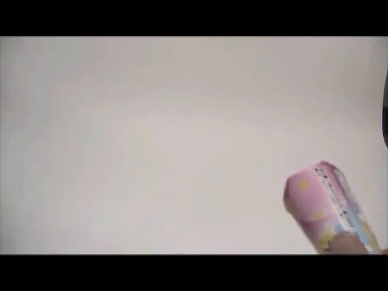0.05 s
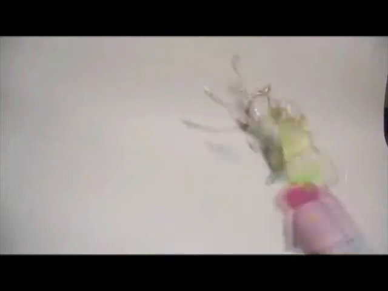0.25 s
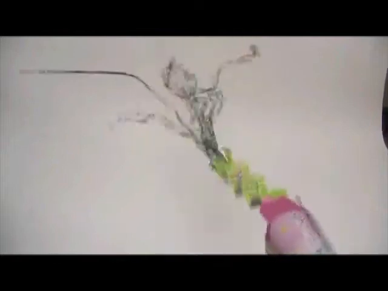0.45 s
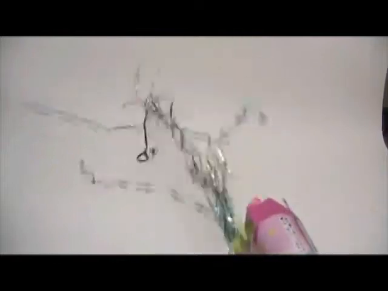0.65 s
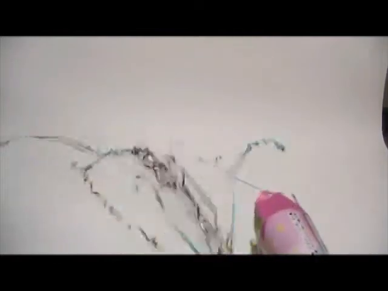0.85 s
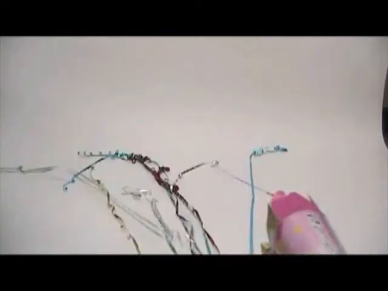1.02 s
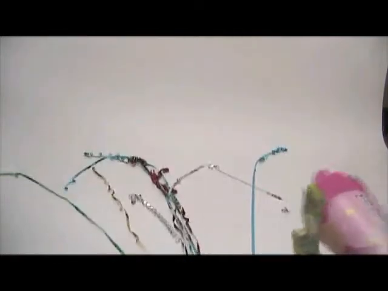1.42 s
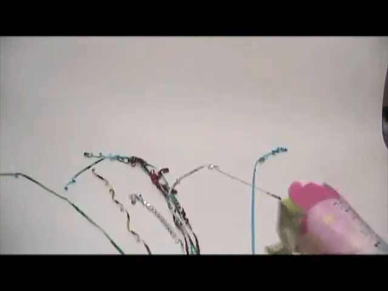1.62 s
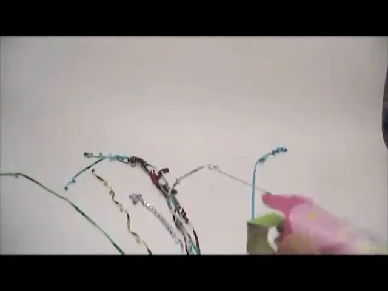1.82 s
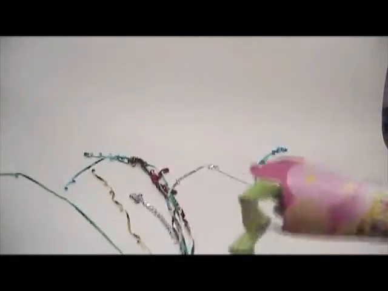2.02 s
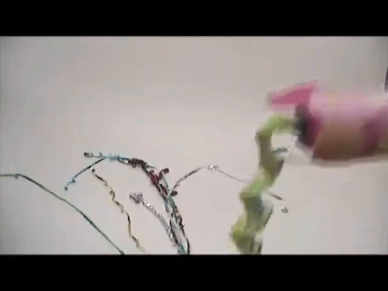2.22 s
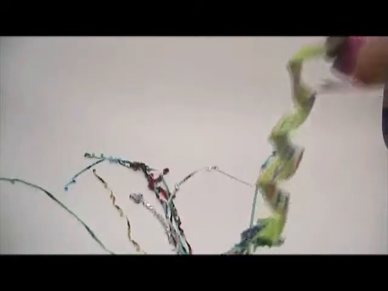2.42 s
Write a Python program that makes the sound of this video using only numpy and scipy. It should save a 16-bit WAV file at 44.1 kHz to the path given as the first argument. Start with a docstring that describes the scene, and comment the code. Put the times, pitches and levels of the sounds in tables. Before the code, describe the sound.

A party popper bangs loudly up close, then paper streamers snap, rustle and settle.

```python
"""A party popper goes off close by in a small room, loud enough to overload the microphone.
Its string creaks, the charge fizzes and bursts, and the blast rings the cardboard cone.
The cap and paper wad knock about; the streamers snap taut, flick the table, rustle and settle.
Near the end the paper on the popper rustles as a hand turns it."""
import sys
import numpy as np
from scipy import signal
from scipy.fft import rfft, irfft, next_fast_len
from scipy.io import wavfile
from scipy.ndimage import map_coordinates

SR = 44100
rng = np.random.default_rng(int(sys.argv[2]) if len(sys.argv) > 2 else 0)


def wrap_up_sound(samples):
    """Save the sound to the file named by the first command line argument, as 16-bit audio."""
    columns = np.atleast_2d(samples).T
    # keep every value between -1 and 1, then stretch to whole-number steps
    tamed = np.clip(columns, -1, 1)
    steps = np.round(tamed * 32767).astype(np.int16)
    wavfile.write(sys.argv[1], SR, steps)


N = 112454

# The tone of each noise, from bass to treble. Each row: frequency in Hz, relative level in dB.
BACKGROUND_TONE = [(25, 1.5), (45, 0.5), (75, -7.5), (120, -2), (200, -6.5), (310, -3), (500, -10),
                   (1000, -13), (2500, -20), (11000, -33.5)]
ROOM_TONE = [(60, -12), (300, 5.5), (700, -4.5), (2200, -0.5), (4000, -7.5), (7000, -12.5), (11000, -17.5)]
HANDLING_TONE = [(300, -12), (2400, -1), (11000, -21)]
CRINKLE_TONE = [(100, -17.5), (300, 9), (700, -2), (1100, 2.5), (2000, 3.5), (4000, -5), (7000, -8),
                (11000, -19.5)]
HISS_TONE = [(500, -26), (2500, 4.5), (4500, 5), (7500, 6.5), (10000, 7.5), (11500, -6)]
SLIDE_TONE = [(1000, -18), (4000, -14), (6500, -8), (8500, -9.5), (11000, -21)]
THUD_TONE = [(25, -50), (70, -33), (140, -7.5), (230, 0), (380, -4), (560, 2.5), (850, -7.5), (1350, -2),
             (2000, -7), (4000, -26.5), (11000, -21)]
CRACK_TONE = [(100, -18), (1200, -2.5), (4500, 0.5), (11000, -12.5)]
BOOM_TONE = [(25, -56), (70, -21), (130, -8.5), (240, 4.5), (340, 1.5), (550, -18), (1000, -24)]
CREAK_TONE = [(60, -12.5), (420, 10), (800, -3), (1400, 12), (2400, -8.5), (3600, 4), (7000, 1),
              (11000, -12.5)]
FIZZ_TONE = [(200, -26.5), (2000, -15.5), (9000, 7.5), (11000, -11.5)]
BLAST_TONE = [(20, -12.5), (45, -2.5), (90, 7), (250, -3), (1000, 12.5), (2800, 6.5), (6500, 1),
              (9000, -1.5), (11000, -9.5)]
ECHO_TONE = [(50, -39.5), (150, -23), (400, -6.5), (560, 1.5), (900, 2), (1250, -5), (1550, -1),
             (1800, -10), (2400, -15.5), (3500, -16.5), (5200, -22), (6500, -19), (8000, -25.5),
             (11000, -26)]
# How alike left and right sound. Each row: frequency in Hz, likeness from 0 (unrelated) to 1 (same).
USUAL_LIKENESS = [(60, 0.19), (300, 0.93), (900, .88), (2000, 0.78), (5000, .6), (11000, .5)]
BACKGROUND_LIKENESS = [(60, 0)]
BLAST_LIKENESS = [(100, 0.61)]
# The hand turns the popper. Each row: start in seconds, level in dB.
HAND_TURNS = [(1.715, -51), (1.79, -47.5), (1.918, -49), (2.262, -54)]
# Streamers and wrapper rub. Each row: time in seconds, crinkle level in dB, hiss level in dB.
RUSTLE_LEVELS = [(0, -104, -88), (.2, -51.5, -90), (.3, -41, -53), (.46, -73, -44), (.62, -68, -52.5),
                 (0.798, -46, -47), (.89, -51.5, -50), (.93, -41.5, -49), (1.031, -51, -49),
                 (1.178, -53, -58), (1.281, -59.5, -54.5), (1.439, -56, -62.5), (1.58, -62.5, -71.5),
                 (1.85, -60, -70), (1.981, -55, -64), (2.08, -57.5, -65.5), (2.231, -59, -61.5),
                 (2.28, -55.5, -57), (2.419, -58, -59), (2.55, -55.5, -56.5)]
# Paper slides over paper. Each row: loudest moment in seconds, half length in seconds, level in dB.
SLIDES = [(1.258, 0.011, -52), (1.503, 0.0093, -53.5), (1.66, 0.03, -53)]
# Light taps. Each row: start in seconds, pitch in Hz, level in dB.
TAPS = [(0.126, 382, -38.5), (0.1753, 2050, -44), (0.4186, 1360, -31), (1.038, 900, -41),
        (1.218, 880, -46.5), (1.3044, 2200, -48.5)]
# Streamer ends hit the table. Each row: start in seconds, level in dB.
FLICKS = [(0.861, -40), (0.9149, -34.5), (.93, -53), (0.97, -30.5), (1.0372, -30), (1.108, -38),
          (1.3045, -36.5), (1.39, -39.5)]
# Streamers pull tight. Each row: start in seconds, level in dB.
SNAPS = [(.473, -16), (0.56, -22), (0.5675, -14), (.634, -15.5), (0.716, -13), (0.726, -25),
         (0.7402, -15.5), (0.7705, -8), (0.778, -30), (0.9185, -29), (0.9482, -35), (1.0463, -29),
         (1.075, -35.5)]
# The cap and paper wad land. Each row: start in seconds, thud level in dB, crack level in dB.
KNOCKS = [(0.3668, -30.5, -31.5), (0.4206, -34.5, -45), (0.4486, -25, -20), (0.4568, -29, -23),
          (0.4726, -30, -20), (.492, -31, -27.5), (0.5467, -33.5, -31.5), (0.7161, -38, -50),
          (0.7702, -50, -35)]
# The pull string slips. Each row: start in seconds, level in dB.
STRING_SLIPS = [(0.0399, -39.5), (.059, -47.5), (0.0909, -23), (0.1175, -39.5), (.126, -40.5), (.181, -46),
                (0.1886, -25)]
# The cone's main notes, then the shove of air with the tube's low note.
# Each row: pitch in Hz, level in dB, fade time in seconds.
CONE_NOTES = [(718, -11.5, 0.092), (777, 5, 0.017), (916, -2, 0.066), (1071, 10, 0.044)]
PUSH_NOTES = [(66, -18.5, .045), (113, -10.5, 0.051), (515, 0, 0.04)]
# Notes that ring on after the burst. Each row: pitch in Hz, relative level in dB.
LINGERING_NOTES = [(330, -9.5), (441, -5.5), (520, -10), (604, -8.5), (707, 1.5), (814, -1), (851, -17),
                   (934, -3.5), (1068, -3.5), (1168, 2), (1277, -0.5), (1486, -4.5), (1556, -3.5),
                   (2350, -13.5)]

TOP_HZ = 11350  # the treble ends here
BOOM_FADE_S = 0.42  # a fade time is how long a sound takes to drop by 60 dB


def amp(db):
    """Turn decibels into a number to multiply by."""
    return 10 ** (np.asarray(db) / 20)


def unit(x):
    """Scale a sound so that its average power is 1."""
    return x / np.sqrt(np.mean(x ** 2) + 1e-20)


def look_up(table, hz):
    """Read between a table's rows, with frequency spaced by octaves."""
    row_hz, values = np.transpose(table)
    return np.interp(np.log(hz + 1), np.log(row_hz + 1), values)


def shape(pair, tone, likeness=USUAL_LIKENESS):
    """Blend two unrelated signals into stereo with this tone and left-right likeness."""
    size = next_fast_len(pair.shape[1])
    hz = np.fft.rfftfreq(size, 1 / SR)
    width = np.arccos(np.clip(look_up(likeness, hz), -1, 1)) / 2
    gain = amp(look_up(tone, hz)) * (hz < TOP_HZ) * [np.cos(width), np.sin(width)]
    mid, side = irfft(rfft(pair, size) * gain, size)[:, :pair.shape[1]]
    return unit(np.array([mid + side, mid - side]))


def noise(tone, likeness=USUAL_LIKENESS, size=N):
    """Steady stereo noise."""
    return shape(rng.standard_normal((2, size)), tone, likeness)


def fade(fade_s, rise_s=1e-4):
    """A one-second loudness curve that rises quickly and dies away."""
    t = np.arange(SR) / SR
    return np.exp(-np.log(1000) * t / fade_s) * (1 - np.exp(-t / rise_s))


def burst(tone, fade_s, rise_s=1e-4):
    """A dying puff of stereo noise."""
    return noise(tone, size=SR) * fade(fade_s, rise_s)


def pulse(hz, fade_s, rise_s):
    """A sharp push of air, only a wave or two long."""
    return np.cos(2 * np.pi * hz * np.arange(SR) / SR) * fade(fade_s, rise_s)


def ringing(notes, rise_s, lead_s=0):
    """Notes struck together; their waves reach the right side lead_s earlier."""
    t = np.arange(SR) / SR + lead_s * np.array([[-.5], [.5]])
    return sum(amp(db) * np.sin(2 * np.pi * hz * t) * fade(fade_s, rise_s) for hz, db, fade_s in notes)


def add(out, start, sound):
    """Mix in a one-second sound at a start time in seconds."""
    part = out[:, max(round(start * SR), 0):][:, :SR]
    part += sound[..., :part.shape[1]]


def background():
    """The room's quiet, steady rumble."""
    return amp(-51) * noise(BACKGROUND_TONE, BACKGROUND_LIKENESS)


def room_echo():
    """The room's answer to one small click."""
    return burst(ROOM_TONE, fade_s=0.17, rise_s=0.0017)


def paper(tone, clicks_per_s=900, flutters_per_s=40):
    """Rubbing paper: a hiss and many tiny uneven clicks, wavering in loudness."""
    sizes = amp(4 * np.minimum(rng.exponential(size=N), 4))
    clicks = (rng.random(N) < clicks_per_s / SR) * sizes * rng.choice([-1, 1], (2, N))
    steps = np.arange(N) / SR * flutters_per_s
    flutter_db = 1.4 * map_coordinates(rng.standard_normal(int(steps[-1]) + 4), [steps])  # smooth wobble
    rub = noise(tone) + amp(-1) * shape(clicks, tone)
    return unit(rub * amp(flutter_db))


def handling():
    """The paper hanging from the spent popper rustles softly as the hand turns it."""
    out = np.zeros((2, N))
    for start, db in HAND_TURNS:
        add(out, start, amp(db) * paper(HANDLING_TONE)[:, :SR] * fade(fade_s=0.13, rise_s=0.0047))
    return out


def streamer_rustle():
    """The streamers fall and settle, slide over each other and are lifted again."""
    t = np.arange(N) / SR
    times, crinkle_db, hiss_db = np.transpose(RUSTLE_LEVELS)
    crinkle = amp(np.interp(t, times, crinkle_db)) * paper(CRINKLE_TONE)
    hiss = amp(np.interp(t, times, hiss_db)) * paper(HISS_TONE)
    swells = sum(amp(db) * np.exp(-.5 * ((t - middle) / half) ** 2) for middle, half, db in SLIDES)
    return crinkle + hiss + swells * paper(SLIDE_TONE)


def taps(fade_s=0.068):
    """Each light tap rings with one short note."""
    out = np.zeros((2, N))
    for start, hz, db in TAPS:
        add(out, start, ringing([(hz, db, fade_s)], rise_s=0.00044))
    return out


def streamer_flicks():
    """Loose paper ends land on the table with a soft tick."""
    out = np.zeros((2, N))
    for start, db in FLICKS:
        tick = burst(CRACK_TONE, fade_s=0.012, rise_s=0.00039)
        add(out, start, amp(db) * (tick + amp(-26) * room_echo()))
    return out


def streamer_snaps():
    """A streamer pulls tight with one sharp click, and the room answers."""
    out = np.zeros((2, N))
    click = pulse(hz=2160, fade_s=0.00076, rise_s=.00002)
    for start, db in SNAPS:
        add(out, start, amp(db) * (click + amp(-22.5) * room_echo()))
    return out


def knocks():
    """Cap and wad hit with a short bump, a papery crack and a hollow thud whose bass lingers."""
    out = np.zeros((2, N))
    bump = amp(15) * pulse(hz=580, fade_s=0.0033, rise_s=.0001)
    for start, thud_db, crack_db in KNOCKS:
        thud = burst(THUD_TONE, fade_s=.16, rise_s=0.00057)
        boom = amp(-8) * burst(BOOM_TONE, BOOM_FADE_S, rise_s=0.02)
        crack = burst(CRACK_TONE, fade_s=.012) + amp(-12.5) * room_echo()
        add(out, start, amp(thud_db) * (bump + thud + boom) + amp(crack_db) * crack)
    return out


def string_creaks():
    """The string slips through the popper's neck in short dry creaks."""
    out = np.zeros((2, N))
    for start, db in STRING_SLIPS:
        creak = burst(CREAK_TONE, fade_s=0.0093)
        echo = amp(-27) * burst(ROOM_TONE, fade_s=0.21)
        add(out, start, amp(db) * (creak + echo))
    return out


def popper_bang(fizz_at_s=.2041, bang_at_s=.2056):
    """The charge fizzes, the seal cracks, gas blasts out and rings the cone, and the room echoes."""
    out, t = np.zeros((2, N)), np.arange(SR) / SR
    blast_hold_s, blast_fade_s = .0105, 0.028
    ring_fade_s, echo_rise_s = 0.19, 0.0033
    lead_s = .00005  # the popper is held to the right
    crack = amp(1.5) * burst(FIZZ_TONE, fade_s=0.0069)
    blast_db = -3.5 - 60 * np.maximum(t - blast_hold_s, 0) / blast_fade_s
    blast = amp(blast_db) * noise(BLAST_TONE, BLAST_LIKENESS, size=SR)
    cone = ringing(CONE_NOTES + PUSH_NOTES, rise_s=.0022, lead_s=lead_s)
    ring = amp(-14.5) * ringing([(hz, db, ring_fade_s) for hz, db in LINGERING_NOTES], echo_rise_s, lead_s)
    # The echo drops fast at first, then leaves a faint, slower tail.
    echo_curve = amp(-4) * fade(0.16, echo_rise_s) + amp(-37.5) * fade(0.61, echo_rise_s)
    echo = noise(ECHO_TONE, size=SR) * echo_curve
    boom = amp(-36) * burst(BOOM_TONE, BOOM_FADE_S, echo_rise_s)
    fizz = amp(-19) * burst(FIZZ_TONE, fade_s=0.036)
    add(out, fizz_at_s, fizz)
    add(out, bang_at_s, crack + blast + cone + ring + echo + boom)
    return out


def scene():
    """Mix all the sounds, a little louder on the right."""
    popper = string_creaks() + popper_bang() + knocks()
    small_sounds = streamer_snaps() + streamer_flicks() + taps() + streamer_rustle() + handling()
    return (popper + small_sounds + background()) * amp([[-0.82], [0.82]])


def record(dry):
    """The bang overloads the microphone; the deepest bass and highest treble are cut."""
    clipped = dry / (1 + np.abs(dry) ** 6) ** (1 / 6)  # rounds off peaks so they stay below 1
    bass_cut = signal.butter(2, 35, "high", fs=SR, output="sos")
    trimmed = signal.sosfilt(bass_cut, clipped)
    size = next_fast_len(N + SR // 2)
    hz = np.fft.rfftfreq(size, 1 / SR)
    treble_cut = 1 / np.sqrt(1 + (hz / TOP_HZ) ** 80)
    return irfft(rfft(trimmed, size) * treble_cut, size)[:, :N]


dry = scene()
out = record(dry)
wrap_up_sound(out)
```